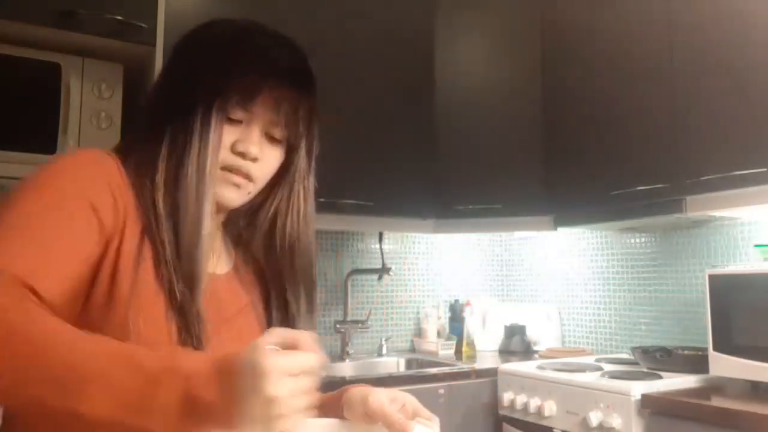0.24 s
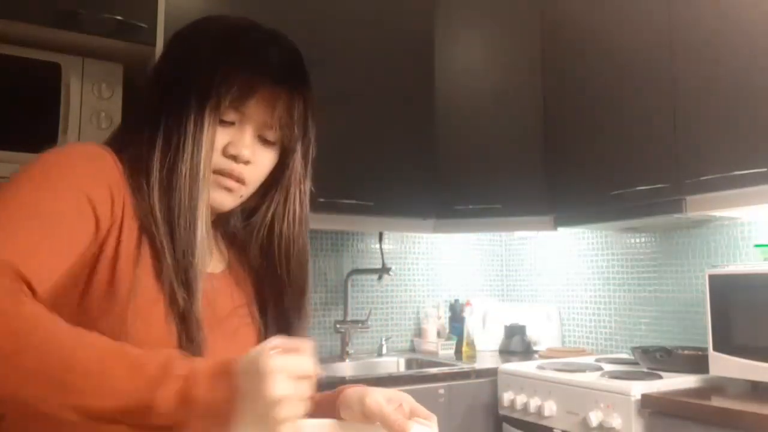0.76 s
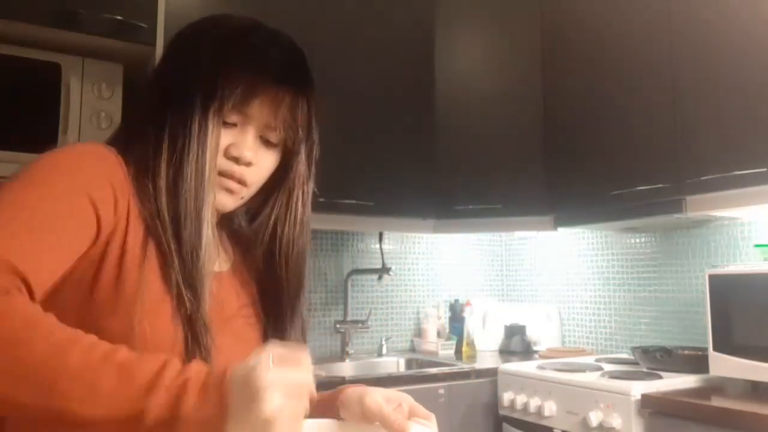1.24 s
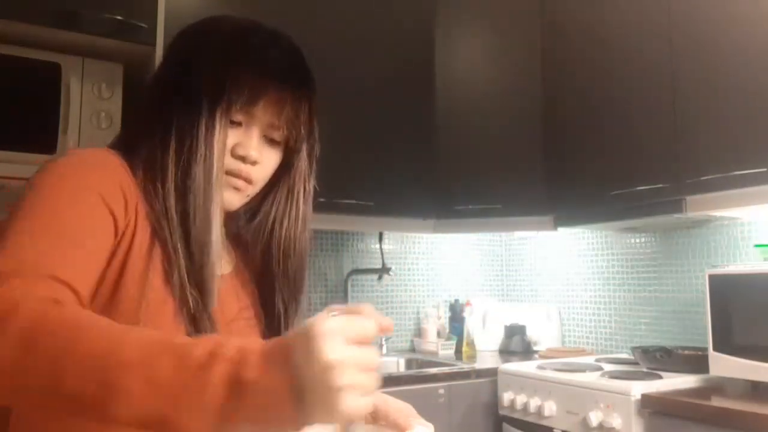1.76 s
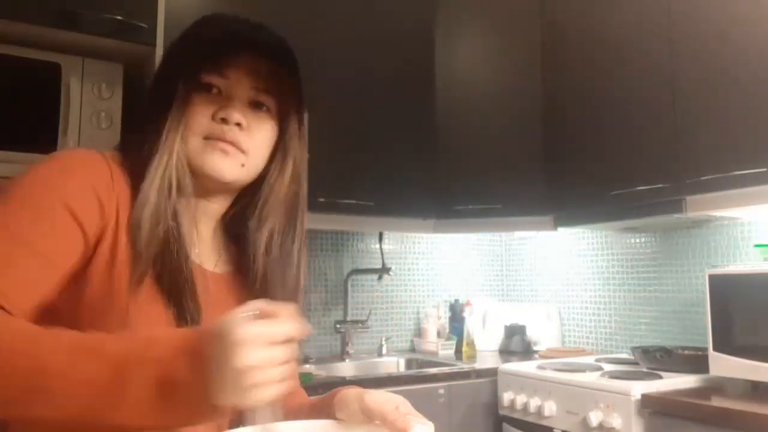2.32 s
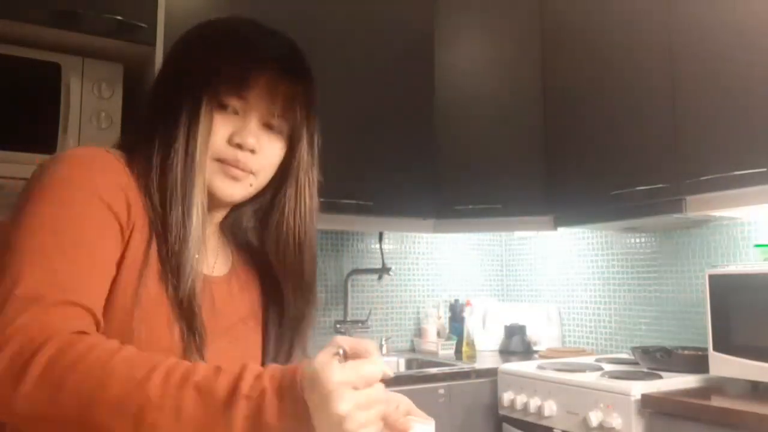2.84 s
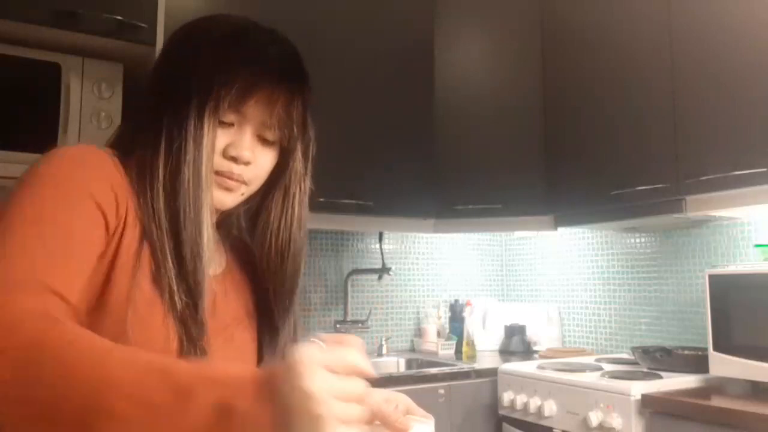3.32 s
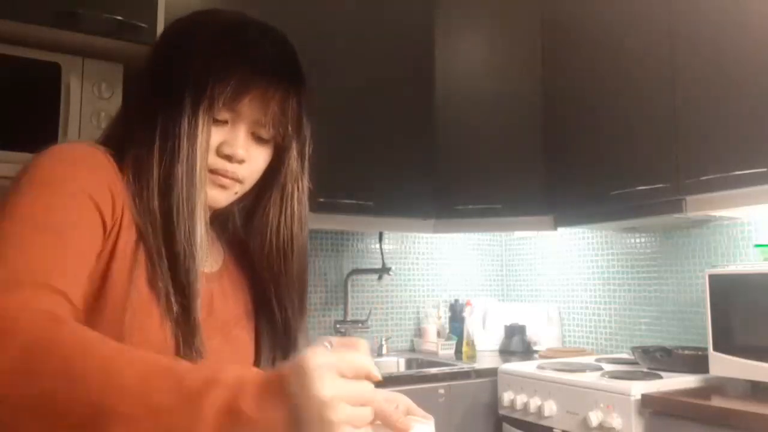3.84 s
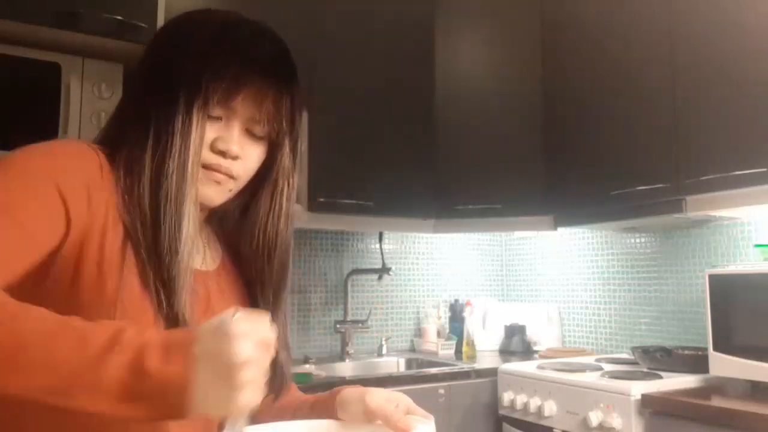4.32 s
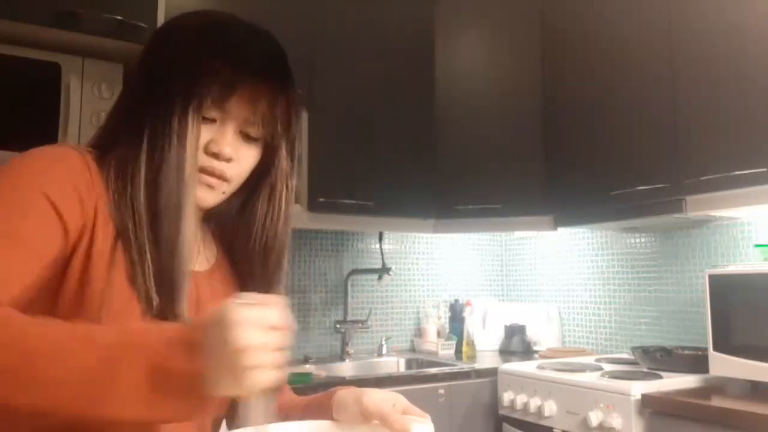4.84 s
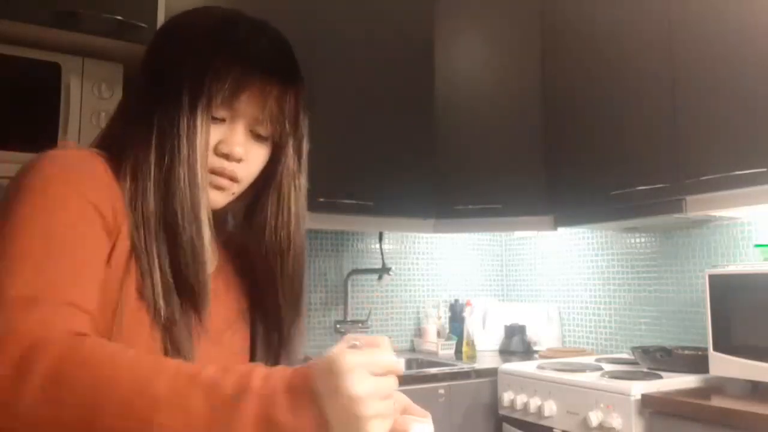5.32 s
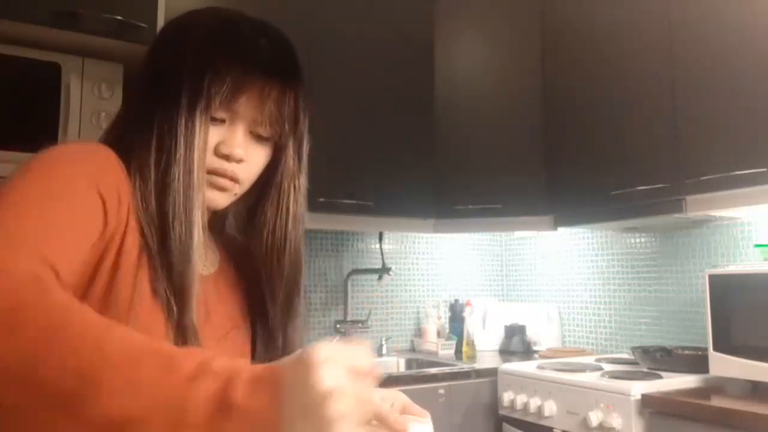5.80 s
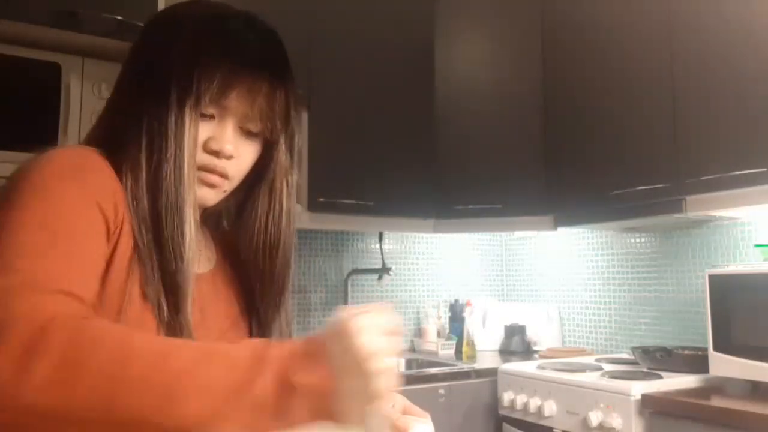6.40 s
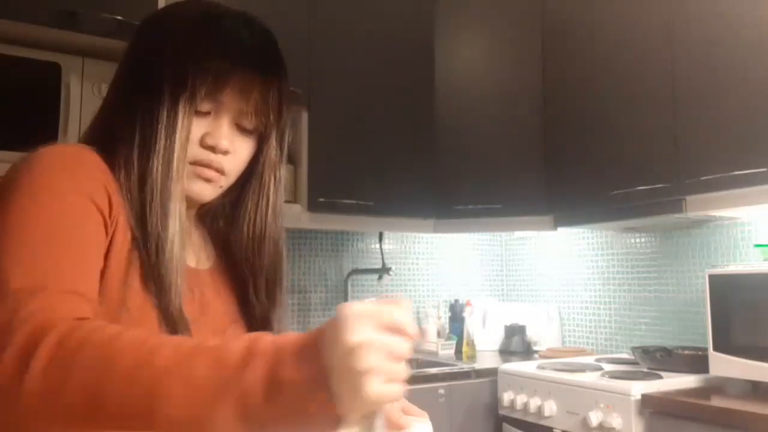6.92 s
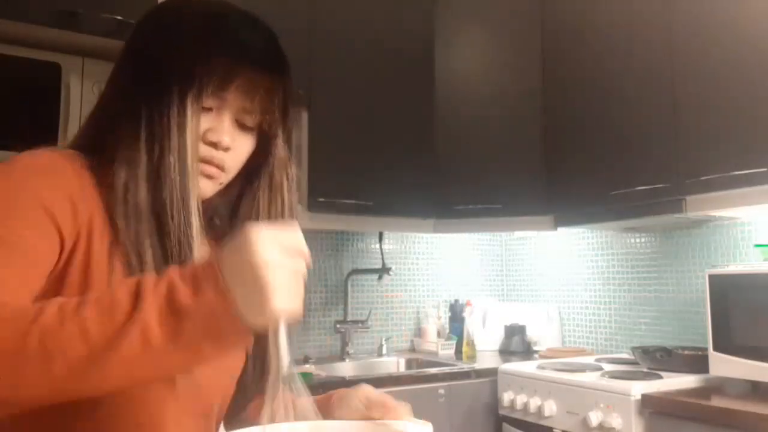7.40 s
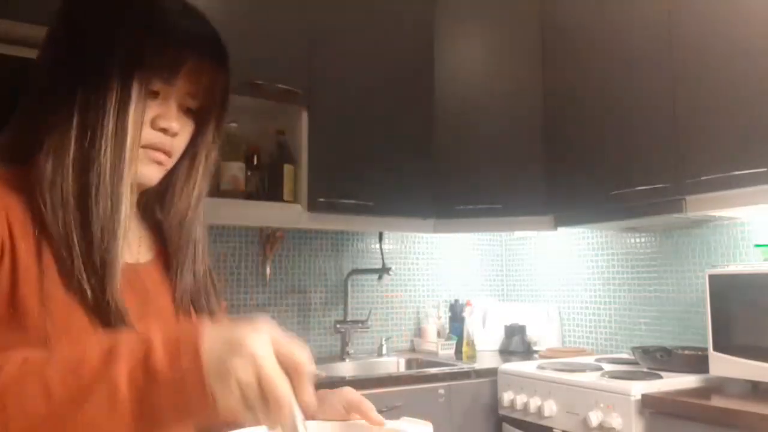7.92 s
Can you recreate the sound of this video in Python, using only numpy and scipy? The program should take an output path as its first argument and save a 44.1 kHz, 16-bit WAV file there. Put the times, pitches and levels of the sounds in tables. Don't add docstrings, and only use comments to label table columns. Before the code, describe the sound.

A wire whisk scrapes through batter in a plastic bowl, its wires clacking against the wall in uneven bursts, with hollow knocks in a small tiled kitchen.

```python
import sys
import numpy as np
from scipy import signal
from scipy.io import wavfile

SR = 44100
rng = np.random.default_rng(int(sys.argv[2]) if len(sys.argv) > 2 else 0)


def int16_out(signal):
    q = np.round(np.clip(np.atleast_2d(signal).T, -1, 1) * 32767)
    wavfile.write(sys.argv[1], SR, q.astype(np.int16))


def boost_factor(decibels):
    exponent = np.asarray(decibels, float) / 20
    return 10 ** exponent


N = 359415
TIME = np.arange(N) / SR

# (time [s], scrape level [dB], treble over it [dB])
SCRAPE = [(0.0, -51.5, -6), (0.07, -56.5, -1.5), (1.23, -55, -7), (1.34, -53, -3), (1.5, -67.5, -7),
          (1.61, -93.5, 5), (1.72, -77.5, 14.5), (1.84, -63.5, 15.5), (1.9, -50, -8.5), (1.97, -55, -12),
          (2.04, -58.5, 8), (2.09, -52, 2), (2.36, -55.5, -3.5), (2.43, -51.5, 14), (2.47, -49, 6.5),
          (2.68, -56.5, -4.5), (2.81, -54.5, 0), (2.95, -59.5, -10), (3.09, -58, 2), (3.24, -63, -9),
          (3.29, -57, -3), (4.02, -57, -8.5), (4.13, -58, 1), (4.2, -62.5, -5.5), (4.49, -64.5, 5),
          (4.54, -65, -1), (4.7, -59, 7), (4.83, -57, -2.5), (5.04, -57, 6), (5.17, -59.5, -2),
          (5.31, -54, 3), (5.47, -59, -12), (5.52, -52.5, 0.5), (5.7, -58, -10), (5.83, -55.5, 0),
          (6.01, -59.5, -12.5), (6.15, -55.5, 11.5), (6.33, -57.5, -13), (6.4, -58, 10.5),
          (6.47, -55.5, -1.5), (6.63, -58, 1), (6.7, -59, -5), (6.83, -62.5, 9), (6.94, -61.5, -10),
          (7.06, -62.5, 11), (7.24, -71.5, -1.5), (7.97, -96, -1), (8.15, -82, 42)]


def scrape():
    contacts = slips(per_s=900, spread_db=6.5, smooth=0.61)
    treble = boost_factor(5) * control(SCRAPE, column=2)
    return control(SCRAPE, column=1) * steel(contacts, treble)


# (time [s], peak level [dB], ring [Hz], treble over the body [dB], rattle length [s])
STROKES = [(0.167, -27.5, 1670, -9, 0.03), (0.385, -30, 2520, -20, 0.022),
           (1.8098, -11.5, 1860, -17, 0.028), (2.0204, -15, 1570, -11, 0.031),
           (2.255, -33, 2210, -18, 0.035), (2.409, -10, 1460, -13.5, 0.027),
           (3.7815, -32.5, 2530, -16, 0.031), (4.0216, -28.5, 1400, -19, 0.027),
           (4.096, -30, 1460, -18, 0.027), (4.675, -26.5, 3660, -10, 0.03),
           (4.9155, -21.5, 2950, -27, 0.026), (5.014, -24, 1430, -13, 0.032),
           (5.3194, -29.5, 1680, -23, 0.026), (5.8455, -30, 1400, -29, 0.025),
           (6.1457, -15, 1560, -16.5, 0.027), (6.3807, -20.5, 4050, -16, 0.024),
           (6.5836, -24.5, 2400, -6, 0.034), (6.8024, -22.5, 1750, -21, 0.03),
           (7.0407, -17.5, 1680, -13, 0.03), (8.1415, -18, 2850, -15, 0.03)]
TAPS = [(0.1655, -29.5, 1690, -2, 0.005), (0.8674, -29, 2480, -5.5, 0.005), (1.1518, -33, 1460, -4, 0.005),
        (1.7125, -36, 1450, -17, 0.005), (1.8213, -24, 1700, -22, 0.005), (2.0233, -27, 2850, -5, 0.005),
        (2.0308, -21, 1490, -13, 0.005), (2.1904, -25, 2400, -11, 0.005), (2.2672, -19, 2140, -12, 0.005),
        (2.4119, -28, 1487, -21, 0.005), (2.4214, -16, 1370, 6, 0.005), (3.0899, -31, 3950, -16, 0.005),
        (4.0272, -43, 1400, -40, 0.005), (4.6753, -24, 3660, -8, 0.005), (4.7341, -24, 5200, 5, 0.005),
        (4.9192, -21, 3100, -7, 0.005), (4.9337, -24, 3000, -34, 0.005), (5.019, -22, 3650, -5, 0.005),
        (5.019, -37, 1460, -3, 0.005), (5.7453, -36, 1430, -24, 0.005), (6.1494, -20, 1560, -10, 0.005),
        (6.3869, -28, 3860, -4, 0.005), (6.5964, -35.5, 2850, -27, 0.005), (6.5969, -40, 2540, -2.5, 0.005),
        (6.8144, -35, 1785, -2, 0.005), (7.0239, -27, 2110, -12, 0.005), (7.0429, -23, 1760, 6, 0.005),
        (7.6216, -36.5, 1380, -21, 0.005), (8.0336, -20.5, 1930, -10, 0.005),
        (8.1349, -20, 2850, -10, 0.005)]


def strikes():
    out = np.zeros(N)
    for table, blows, trim_db in [(STROKES, 40, -2), (TAPS, 6, 2)]:
        for s, db, hz, treble_db, rattle_s in table:
            add(out, s, boost_factor(db + trim_db) * tap(hz, treble_db, rattle_s, blows))
    return out


def tap(hz, treble_db, rattle_s, blows):
    wait, softness, sign = rng.random((3, blows))
    at = (np.clip(rattle_s, 0.001, 0.06) * SR * wait).astype(int)
    swell = np.sqrt(wait + 0.14) * (1.15 - wait)
    train = np.zeros(4000)
    np.add.at(train, at - at.min(), swell * boost_factor(-15 * softness) * np.sign(sign - 0.5))
    t = np.arange(500) / SR
    decay = boost_factor(-60 * t / 0.015)
    ring = np.convolve(train, np.sin(2 * np.pi * hz * t) * decay)[:4000]
    sound = steel(train, boost_factor(treble_db + 14)) + 0.5 * evened(ring)
    return sound / abs(sound).max()


# (frequency [Hz], level per Hz [dB])
WIRES = [(470, -34.5), (800, -1), (1000, -4), (1510, 3), (1960, -1.5), (2670, -1.5), (2880, -2),
         (5710, -4.5), (6960, -5.5), (7980, -9.5), (9740, -11), (13300, -14), (15600, -62)]
# (frequency [Hz], width [Hz], level [dB])
WALL = [(1400, 230, -6), (1560, 80, -7.5), (2115, 170, 0.5), (2850, 170, -3), (3450, 580, 2),
        (4230, 81, -19), (6360, 330, -11.5)]


def steel(contacts, treble):
    plain = coloured(contacts, WIRES)
    plain = plain + resonate(plain, WALL)
    body = band(plain, "low", 5000)
    return evened(body) + treble * evened(plain - body)


# (time [s], level [dB])
WHISK_RING = [
    (7.27, -97),
    (7.32, -88),
    (7.45, -81),
    (7.52, -86),
    (7.62, -82),
    (7.7, -103),
]


def whisk_hum():
    hz = 965 + 6 * np.sin(2 * np.pi * 11 * TIME)
    hum = control(WHISK_RING, column=1) * np.sin(2 * np.pi * np.cumsum(hz) / SR)
    return hum * (abs(TIME - 7.5) < 0.25)


def whisk():
    return scrape() + strikes() + whisk_hum()


# (time [s], shell rub level [dB], worktop rumble level [dB])
STIR = [(0.0, -64, -71), (0.18, -49.5, -51), (0.29, -59.5, -54.5), (1.07, -55.5, -49), (1.25, -55.5, -58),
        (1.36, -55, -50.5), (1.52, -71.5, -72), (1.77, -108, -81), (1.88, -59, -72), (1.97, -63.5, -73),
        (2.54, -59, -59.5), (2.63, -58.5, -58), (2.9, -79, -74), (3.04, -60, -51.5), (3.36, -59, -58),
        (3.72, -56.5, -53), (3.97, -50.5, -50), (4.15, -54.5, -57), (4.4, -71.5, -73), (4.67, -65.5, -67.5),
        (4.81, -62, -66.5), (5.31, -65.5, -60), (5.49, -55.5, -56.5), (6.11, -62, -52.5), (6.33, -64, -73),
        (6.54, -61.5, -59.5), (6.81, -69, -91), (7.04, -65.5, -76), (7.19, -84, -87), (7.56, -93, -72),
        (8.15, -100, -80)]
# (time [s], peak level [dB], pitch [Hz])
KNOCKS = [(0.635, -43, 666), (0.747, -44, 650), (0.868, -41.5, 530), (1.024, -31, 640), (1.149, -44, 737),
          (1.213, -47, 570), (1.294, -43.5, 590), (1.822, -32.5, 726), (2.034, -37, 603), (2.192, -47, 754),
          (2.412, -46, 692), (2.662, -66, 744), (3.108, -43.5, 573), (3.707, -43, 650), (3.781, -37.5, 670),
          (3.954, -49, 620), (3.991, -32.5, 675), (5.018, -42, 537), (5.584, -42, 650), (5.841, -40, 644),
          (5.982, -46.5, 627), (6.025, -35, 735), (6.072, -34.5, 564), (6.15, -24.5, 674),
          (6.389, -34, 552), (6.815, -32.5, 660), (7.044, -36, 584), (7.626, -35, 571), (8.033, -45.5, 764),
          (8.134, -36.5, 646)]
# (frequency [Hz], width [Hz], level [dB])
BOWL = [(565, 58, 0), (650, 75, 3.5), (746, 80, -4.5), (328, 70, -14), (884, 270, -10.5)]


def bowl():
    rub = band(slips(per_s=250, spread_db=3, smooth=0.41), "low", 870, order=4)
    out = control(STIR, column=1) * evened(resonate(rub, BOWL))
    for s, db, hz in KNOCKS:
        add(out, s, boost_factor(db + 5.5) * blow(hz, BOWL, push_s=0.0013, t60=0.06, share=0.47))
    return band(out, "high", 320)


# (time [s], peak level [dB], pitch [Hz])
THUMPS = [(0.167, -36, 72.7), (0.168, -31, 215), (0.221, -32.5, 222), (0.327, -44, 122), (0.398, -35, 91.5),
          (0.629, -34.5, 93), (0.793, -41, 128), (0.919, -49, 72.7), (0.919, -31, 101), (1.147, -30, 96),
          (1.335, -39, 210), (1.825, -62, 143), (2.034, -63, 244), (2.196, -42, 86.1), (2.271, -36.5, 105),
          (2.413, -59, 102), (2.829, -37.5, 110), (3.574, -37, 91), (3.825, -40, 96), (3.992, -28, 228),
          (4.292, -36.5, 108), (4.677, -42, 96.9), (4.771, -39, 123), (5.305, -42, 207),
          (5.505, -38.5, 152), (5.579, -38, 113), (5.682, -49, 107), (5.832, -34.5, 105), (6.032, -36, 205),
          (6.152, -42, 110), (6.224, -28, 117), (7.039, -47.5, 147), (7.34, -37.5, 94), (7.623, -25.5, 124),
          (8.037, -40.5, 130)]
# (frequency [Hz], width [Hz], level [dB])
WORKTOP = [(92, 13, 0.5), (124.9, 46, 4.5), (215, 57, 1.5)]


def worktop():
    shuffle = band(slips(per_s=50, spread_db=6, smooth=0.15), "low", 262, order=3)
    out = control(STIR, column=2) * evened(resonate(shuffle, WORKTOP))
    for s, db, hz in THUMPS:
        add(out, s, boost_factor(db - 4) * blow(hz, WORKTOP, push_s=0.004, t60=0.037, share=0.41))
    return out


def blow(hz, modes, push_s, t60, share):
    t = np.arange(5000) / SR
    push = np.sin(np.pi * np.minimum(t / push_s, 1)) ** 2
    own = resonate(push, [(hz, 2 / t60, 0)])
    sound = evened(own) + share * evened(resonate(push, modes))
    return sound / abs(sound).max()


# (frequency [Hz], time to fall 60 dB [s])
KITCHEN = [(100, 0.31), (300, .33), (800, 0.28), (2000, 0.16), (5000, 0.18), (12000, 0.19)]


def kitchen(x, gap_s):
    echoes = np.zeros((3, 2, SR // 2))
    at = np.arange(0, SR // 2 - 1000, 20) + round(gap_s * SR)
    at = at + rng.integers(0, 20, (3, 2, len(at)))
    np.put_along_axis(echoes, at, rng.choice([-1., 1.], at.shape), 2)
    hz, t, z = signal.stft(echoes, SR, nperseg=256)
    decay = boost_factor(-60 * t / read(KITCHEN, hz)[:, None])
    tail = signal.istft(z * decay, SR, nperseg=256)[1]
    tail = tail / np.linalg.norm(tail[0, 0])
    turns = np.sqrt(2 / 3) * np.cos(np.pi * (4.3 * TIME + np.arange(3)[:, None] / 3))
    wet = signal.oaconvolve((x * turns)[:, None], tail, axes=2)
    return wet.sum(0)[:, :N]


# (frequency [Hz], level per Hz [dB])
AIR = [(18, -31), (30, -26), (59, -15.5), (97, 5.5), (177, -1.5), (213, -11.5), (467, -30.5), (1050, -19.5),
       (1510, -23), (15500, -24.5)]


def quiet_air():
    air = np.array([coloured(noise, AIR) for noise in rng.standard_normal((2, N))])
    return boost_factor(-72.5) * evened(air)


def slips(per_s, spread_db, smooth):
    size = boost_factor(spread_db * np.minimum(rng.exponential(1, N), 4)) * rng.choice([-1., 1.], N)
    contacts = size * (rng.random(N) < per_s / SR)
    return evened(evened(contacts) + smooth * rng.standard_normal(N))


def resonate(x, modes):
    return sum(boost_factor(db) * signal.lfilter(*signal.iirpeak(hz, hz / width, SR), x) for hz, width, db in modes)


def coloured(x, points):
    hz = np.abs(np.fft.fftfreq(4096, 1 / SR))
    log_gain = np.log(boost_factor(np.maximum(read(points, hz), -90)))
    taps = np.fft.ifft(np.exp(np.conj(signal.hilbert(log_gain)))).real
    if abs(taps[-64:]).sum() > abs(taps[:64]).sum():
        taps = np.roll(taps[::-1], 1)
    return signal.oaconvolve(x, taps[:2048])[:len(x)]


def band(x, kind, hz, order=2):
    return signal.sosfilt(signal.butter(order, hz, kind, fs=SR, output="sos"), x)


def read(points, hz):
    f, value = np.transpose(points)
    return np.interp(np.log(hz + 1), np.log(f + 1), value)


def control(rows, column):
    rows = np.array(rows)
    return boost_factor(np.interp(TIME, rows[:, 0], rows[:, column]))


def evened(x):
    return x / np.sqrt(np.mean(x ** 2) + 1e-20)


def add(mix, s, sound):
    part = mix[round(s * SR):][:len(sound)]
    part += sound[:len(part)]


def scene():
    wires, shell, top = whisk(), bowl(), worktop()
    near = np.array([np.roll(wires, 19), wires])
    boom = kitchen(top, gap_s=0.0032)
    boom = boom + 2.68 * boom.mean(0)
    wet = kitchen(boost_factor(2) * wires + boost_factor(-5) * shell, gap_s=0.002) + boost_factor(-12.5) * boom
    return near + shell + top + wet + quiet_air()


def low_pass(x):
    return signal.sosfilt(signal.butter(12, 15770, fs=SR, output="sos"), x)


def record(dry):
    thin = band(dry, "high", 58.5, order=4)
    mix = band(thin, "low", 18000, order=6)
    return low_pass(mix)


dry = scene()
out = record(dry)
int16_out(out)
```